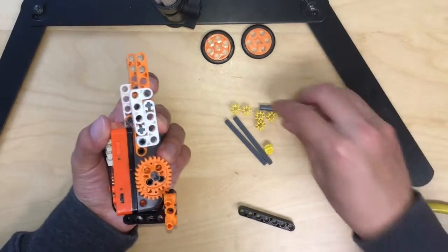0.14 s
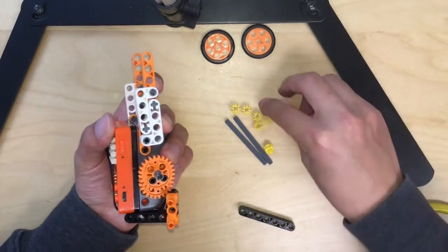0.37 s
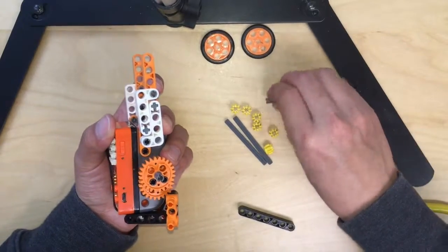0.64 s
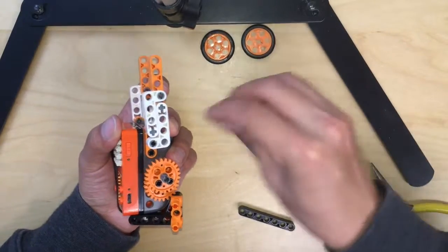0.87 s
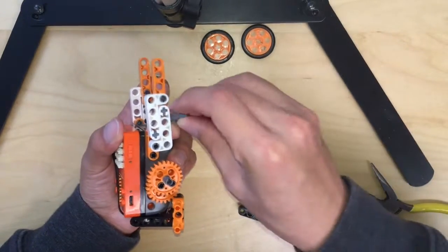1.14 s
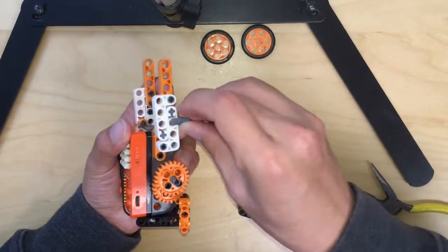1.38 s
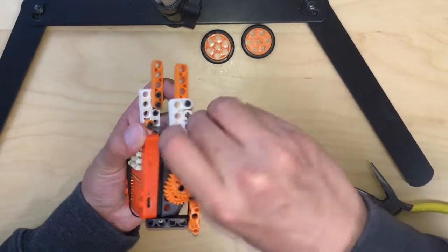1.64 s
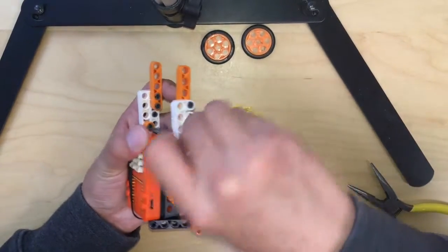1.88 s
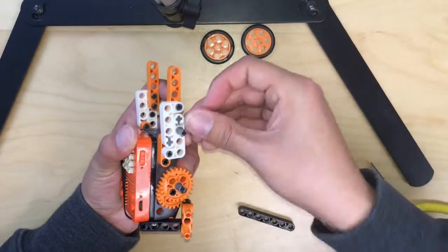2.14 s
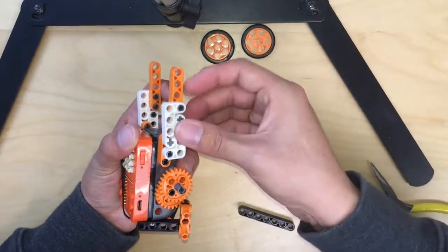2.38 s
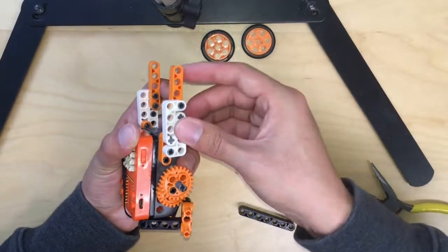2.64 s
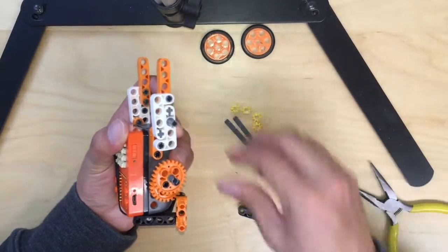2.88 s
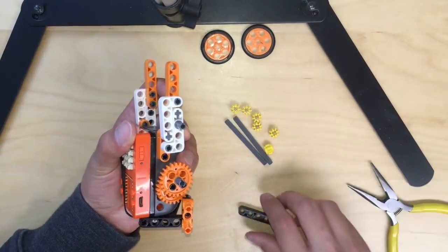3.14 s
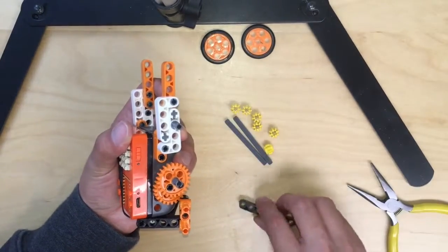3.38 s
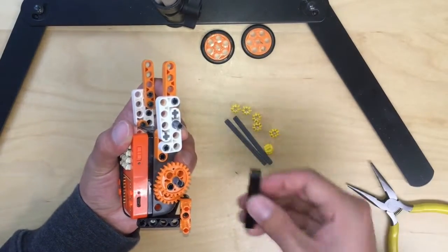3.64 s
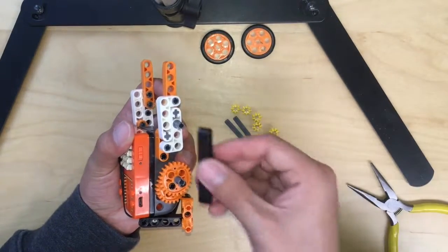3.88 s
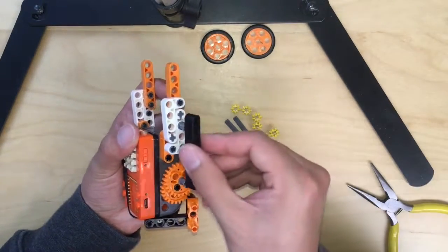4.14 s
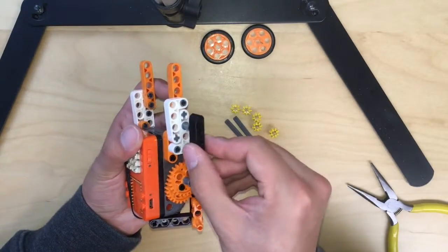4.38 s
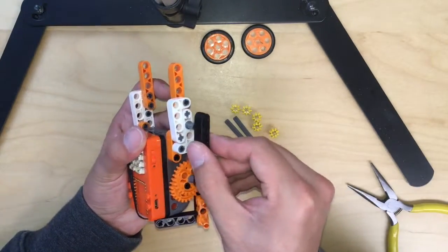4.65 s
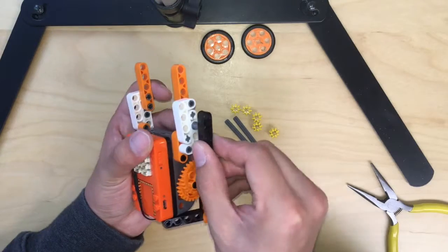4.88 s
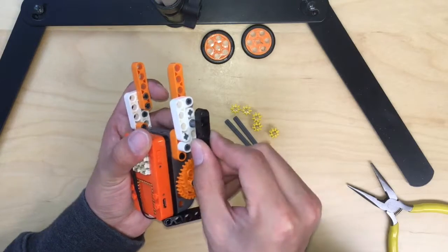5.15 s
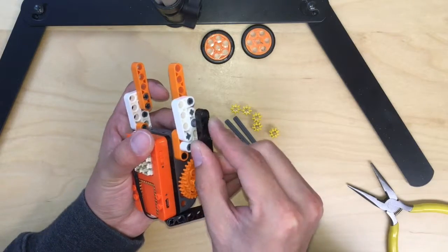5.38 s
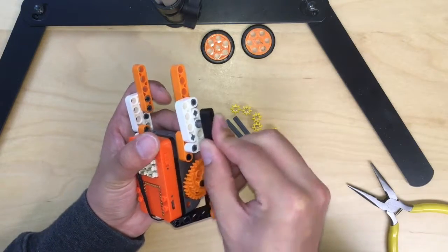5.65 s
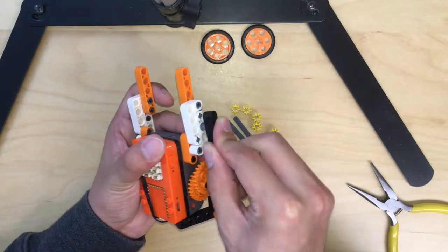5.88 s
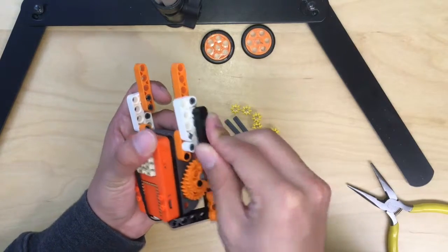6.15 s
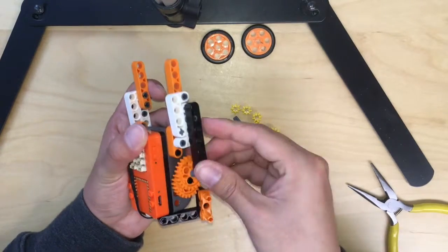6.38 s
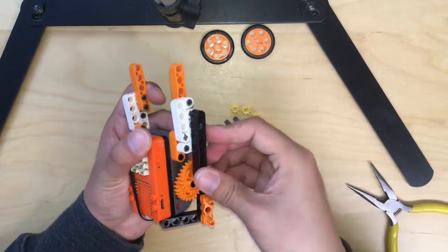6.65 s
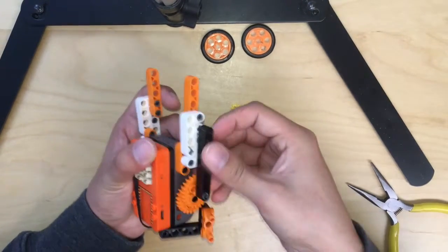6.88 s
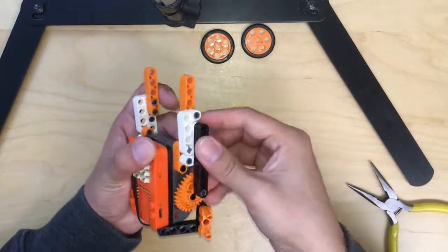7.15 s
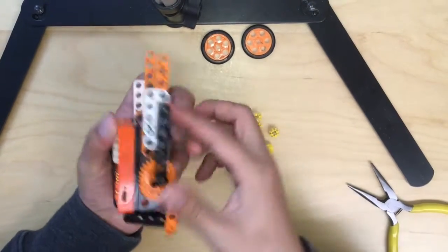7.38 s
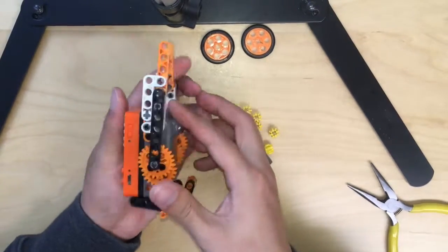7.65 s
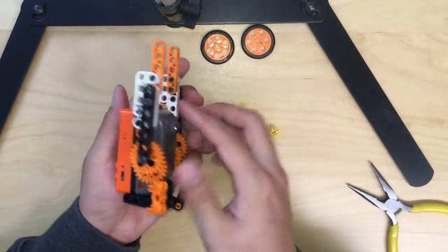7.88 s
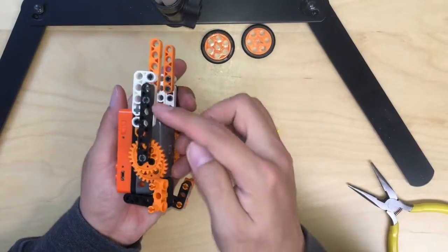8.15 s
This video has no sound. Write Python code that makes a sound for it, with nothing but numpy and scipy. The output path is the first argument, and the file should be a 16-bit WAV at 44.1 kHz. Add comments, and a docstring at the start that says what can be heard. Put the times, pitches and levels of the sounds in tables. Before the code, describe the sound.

In a small quiet room, a close microphone picks up parts dragging on wood in short gritty slips, skin brushing plastic, and pins seating with crisp hollow clicks. One loud snap comes early, after a quiet pause a run of medium clicks, then two sharper snaps, ending with soft swishes and small ticks. A faint unsteady low hum continues throughout, with light hiss that rises after loud snaps.

```python
"""Small plastic beams and pins snap and tick in someone's hands just above a wooden table, close by.
Each snap is a short burst of noise ringing through hollow plastic, with a near wall and the room answering.
Parts drag over wood in uneven slips, skin swishes on plastic, and a loose pin lands and rings.
Underneath, the room hums and rumbles (wavering tones, low noise) and the microphone hisses (high noise);
a noise suppressor holds that noise down and lets it through for a while after each loud snap."""
import sys
import numpy as np
from scipy import signal
from scipy.fft import rfft, irfft, next_fast_len
from scipy.io import wavfile
from scipy.ndimage import uniform_filter1d, map_coordinates

SR = 44100
rng = np.random.default_rng(int(sys.argv[2]) if len(sys.argv) > 2 else 0)


def int16_out(signal):
    """Quantize to a 16-bit WAV file."""
    q = np.round(np.clip(np.atleast_2d(signal).T, -1, 1) * 32767)
    wavfile.write(sys.argv[1], SR, q.astype(np.int16))


def voltage_ratio(level):
    """Linear amplitude factor for a level in decibels (scalar or array-like)."""
    return 10 ** (np.asarray(level, float) / 20)


N = 364266  # length [samples]

# shape of the room's low air noise: (frequency [Hz], relative density [dB per Hz])
RUMBLE_SPECTRUM = [(20, -33), (33, -6.5), (48, -4), (65, -7), (80, -3), (100, -5.5), (135, -4),
                   (161, -17.5), (188, -17), (247, -19.5), (350, -26.5), (600, -34.5), (900, -46.5),
                   (1500, -77.5)]
# shape of the microphone's noise: (frequency [Hz], relative density [dB per Hz])
HISS_SPECTRUM = [(350, -32), (700, -7), (1100, -7), (2000, -10.5), (4200, -12.5), (4950, -17.5),
                 (5700, -12.5), (6800, -13), (7600, -16), (9300, -11.5), (10350, -16), (11200, -11),
                 (14800, -8.5), (15800, -10)]
# hums and faint tones of the room: (frequency [Hz], level before a shared lift [dB], unsteadiness [0-1])
HUM_TONES = [(51.6, -61.5, 1), (119.8, -63, 0.4), (359, -94, 0.1), (1570, -102, 0.1), (1690, -99, 0),
             (1800, -94, 0.1)]
# what the suppressor takes from the noise, given back when it lets go: (frequency [Hz], amount [dB])
SUPPRESSED = [(300, 1), (700, 6), (1500, 8.5), (5000, 12.5), (10000, 10), (15000, 6)]
# how long the room rings: (frequency [Hz], time to fall 60 dB [s])
ROOM_DECAY = [(1000, .09), (3000, 0.12), (6000, .13), (10000, .16), (16000, 0.084)]
# a part dragged over wood, a low set then a high set: (frequency [Hz], width [Hz], relative level [dB])
DRAG_RESONANCES = [
    [(607, 700, -3), (1115, 250, 2.5), (1420, 350, 0.5), (2210, 410, 1), (2660, 330, -3)],
    [(3020, 150, -2.5), (3570, 110, -1.5), (3800, 170, -4), (4510, 140, -3), (5230, 150, -4.5),
     (6320, 310, -7), (8730, 870, -13)],
]
# parts dragged over wood: (start [s], length [s], scuff level [dB], fade over the stroke [dB],
# grit relative to scuff [dB])
DRAG_STROKES = [(.004, 0.015, -72, 2, -20), (.03, 0.26, -80, 5, -22), (0.34, .03, -70, 8.5, 1.5),
                (0.439, .018, -68, 11, -2.5), (.462, 0.04, -69.5, 0, 2), (0.517, 0.076, -70, 3.5, 5),
                (.715, .04, -80.5, 4, -1.5), (1.16, .012, -81, 4, 1), (1.841, 0.022, -77, -3, -5),
                (3.345, 0.019, -68.5, -2.5, -15), (3.371, 0.034, -66.5, 15, -2.5),
                (6.023, .008, -74.5, -0.5, -2), (6.045, .015, -68, 9, -9), (7.418, 0.12, -68.5, 8, -2.5),
                (7.588, 0.041, -79, 1, -0.5), (7.686, .08, -87.5, 2.5, 7)]
# shape of the sound of skin on plastic: (frequency [Hz], relative density [dB per Hz])
SKIN_SPECTRUM = [(3820, -55), (6500, -10), (11200, -8.5), (12100, -11.5), (14000, 1.5), (16000, -8)]
# skin brushing plastic: (start [s], length [s], level [dB])
SKIN_STROKES = [(0.34, .04, -88), (.72, 0.037, -72.5), (1.827, .04, -77), (2.053, .12, -75.5),
                (3.349, 0.041, -79), (6.018, .012, -72), (7.364, .025, -71), (7.466, 0.066, -70),
                (7.675, .1, -74.5)]
# a loose pin lands on the table: (time [s], level [dB])
PIN_LANDINGS = [(0.332, -67.5), (0.472, -55)]
# the notes of the pin: (frequency [Hz], level relative to the landing [dB], time to fall 60 dB [s])
PIN_NOTES = [(10080, 9.2, 0.056), (12540, 4, .035)]
# parts touching: (time [s], energy over 1 ms in each range before the other terms [dB],
# brightness [dB per octave], hollowness [dB per octave squared], contact length [ms])
CONTACTS = [(0.3196, -66, -6, -5.5, 3.1), (0.333, -69, 9.5, 2, 3.9), (0.398, -76, 4.3, 4, 3.9),
            (0.4072, -71, -0.2, 0.6, 4.4), (0.4321, -69, -5, -7, 2.8), (0.4364, -60.5, -9.5, -8.5, 4.5),
            (0.4623, -58, 3, 2, 5.1), (0.4725, -56, 8, 2, 3.7), (1.116, -51.5, -2, -3.5, 2.6),
            (1.1622, -60.5, -6.5, -5.5, 5.5), (1.3285, -72.5, -3.5, -1.5, 2.1),
            (1.4953, -63, -6.5, -4, 5.0), (1.5223, -60, 0.0, -3.5, 2.2), (1.7419, -58.5, 4.1, 2, 1.8),
            (1.779, -65.5, -6, -3.4, 2.1), (1.8593, -67.5, -5, 1, 4.7), (2.5387, -73, 10, -0.5, 2.0),
            (2.5507, -70, 8, -3, 2.3), (2.562, -29, 9, -0.7, 2.6), (2.8278, -61.5, 0.2, -4, 4.0),
            (2.8388, -66, -1, -0.5, 3.0), (3.3657, -50, -1.2, -1, 2.8), (4.2392, -63, 3.8, 0, 1.7),
            (4.245, -66, -1, 0, 2), (4.655, -70.5, 0, -0.5, 1.5), (4.6961, -55, 0.9, 1.5, 1.2),
            (4.7283, -71, 1, 3, 1.3), (5.004, -73.5, -4, 0, 2.5), (5.1075, -75, 4.3, 0.9, 4.1),
            (5.3142, -46, 4, 1.2, 2.8), (5.3263, -69, -4.5, 0.5, 3.6), (5.4783, -72, 1.5, 0.5, 1.9),
            (5.5831, -67, -0.5, -2.5, 1.3), (5.673, -54.5, 5.5, 4.5, 1.7), (5.6763, -40.5, 2, -1, 3.3),
            (5.71, -51, 5.8, -0.6, 1.9), (5.7181, -60.5, 4.5, 4, 2), (5.7627, -60.5, -0.8, -2.5, 2.4),
            (5.8011, -73.5, 1.9, 1.5, 1.1), (5.886, -62.5, -1.2, -1.1, 1.8),
            (6.0306, -47.5, -2.5, -1.6, 3.2), (6.0422, -59, -3.7, 0.1, 3.3), (6.2905, -65.5, 0.5, -3, 1.5),
            (6.601, -68.5, 0, -0.5, 2), (6.6255, -73, -4, 2, 6.1), (6.6333, -39.5, -2.1, 1, 2.2),
            (6.648, -23.5, 3, 0, 1.5), (6.9552, -59, -1, -2, 1.0), (7.1225, -58.5, 0, -1.8, 3.2),
            (7.134, -64.5, -2, 1, 4.9), (7.1485, -22.5, 6.5, 0.55, 1.66), (7.382, -62, -0.5, 0, 4.0),
            (7.429, -64.5, -3.6, 1.5, 3.7), (7.441, -62, 0.5, 1, 3.5), (7.565, -52, -2.5, -3.5, 1.5),
            (7.6421, -60, -6, -1, 1.5)]
# average broad resonances of the hollow plastic: (frequency [Hz], width [Hz], relative level [dB])
PLASTIC_RESONANCES = [(1185, 150, -19), (2470, 520, -11.5), (3420, 410, -14.5), (4150, 270, -14.5),
                      (5550, 470, -9), (6700, 800, -6.5), (8060, 1200, -3), (9270, 1600, -0.5),
                      (11300, 1400, 2), (13100, 1800, 2), (15200, 1500, 1.5)]
# edges of the knock, middle, click and sparkle ranges: (frequency [Hz])
RANGE_EDGES = [900, 3200, 7000, 11500, 16500]
# added to every contact in those four ranges: (level [dB])
RANGE_LIFT = [0.27, -1, 1.1, -0.5]

PIVOT_HZ = 6000  # brightness and hollowness change nothing here
TOP_HZ = 15950  # little or nothing is heard above this


def unit(x):
    """Scale a sound to an average (rms) size of 1."""
    return x / np.sqrt(np.mean(x ** 2) + 1e-20)


def along(points, hz):
    """Read a curve of (Hz, value) points on a log frequency axis."""
    f, value = np.transpose(points)
    return np.interp(np.log(hz + 1), np.log(f + 1), value)


def wobble(rate):
    """A smooth random curve with rate new values a second."""
    knots = rng.standard_normal(int(N * rate / SR) + 4)
    return map_coordinates(knots, [np.arange(N) * rate / SR])


def coloured(x, spectrum):
    """Shape a sound by a spectrum of (Hz, dB) points, then scale it to rms 1."""
    padded = next_fast_len(N + 8192)
    gain = voltage_ratio(along(spectrum, np.fft.rfftfreq(padded, 1 / SR)))
    return unit(irfft(rfft(x, padded) * gain, padded)[:N])


def below(x, hz):
    """Remove everything from hz upward."""
    return irfft(rfft(x) * (np.fft.rfftfreq(N, 1 / SR) < hz), N)


def resonances(modes, f):
    """Frequency response of damped (Hz, width, dB) resonances, with alternating signs."""
    return sum((-1) ** k * voltage_ratio(db) * 1j * f * width / (centre * centre - f * f + 1j * f * width)
               for k, (centre, width, db) in enumerate(modes))


def strokes(start, length, db, fade_db, rise, fall):
    """One loudness curve per stroke: a rise, a hold that fades, a fall (rise and fall in dB per s)."""
    t = np.arange(N) / SR - np.c_[start]
    edges_db = rise * np.maximum(-t, 0) + fall * np.maximum(t - np.c_[length], 0)
    progress = np.clip(t / np.c_[length], 0, 1)
    return voltage_ratio(np.c_[db] - np.c_[fade_db] * progress - edges_db)


def room_tail(size):
    """A fresh noise tail of energy 1, in which each frequency dies away at its own speed."""
    hz, t, z = signal.stft(rng.standard_normal(size), SR, nperseg=128)
    decay = voltage_ratio(-60 * t / along(ROOM_DECAY, hz)[:, None])
    tail = signal.istft(z * decay, SR, nperseg=128)[1][:size]
    return tail / np.linalg.norm(tail)


def background():
    """Low air rumble of the room and the microphone's own hiss, both noise with a slowly wavering level."""
    drift_db = 1.36
    rumble_db = -57.5 + drift_db * wobble(1.5)
    hiss_db = -76 + drift_db * wobble(1.5) + .9 * wobble(10)  # the hiss also flickers faster
    rumble = voltage_ratio(rumble_db) * coloured(rng.standard_normal(N), RUMBLE_SPECTRUM)
    hiss = voltage_ratio(hiss_db) * coloured(rng.standard_normal(N), HISS_SPECTRUM)
    return rumble + hiss


def hum():
    """Room tones as sine waves; the unsteady ones drift in size and phase."""
    t = np.arange(N) / SR
    lift_db = 1.0
    out = np.zeros(N)
    for hz, db, loose in HUM_TONES:
        size = voltage_ratio(db + lift_db) * (1 + loose * wobble(6.2))
        out += size * np.sin(2 * np.pi * hz * t + 4.5 * loose * wobble(5.4))
    return out


def slides():
    """Parts drag over wood in quick uneven slips; skin on plastic gives a smoother high swish."""
    *drag, grit_db = np.transpose(DRAG_STROKES)
    drags = strokes(*drag, rise=1160, fall=800)
    scuff, grit = drags.sum(0), voltage_ratio(grit_db) @ drags
    brush = strokes(*np.transpose(SKIN_STROKES), 0, rise=400, fall=540).sum(0)

    # around 130 slips a second; each starts strong and eases off
    slip_rate = 130 * voltage_ratio(2.5 * wobble(40))
    cycle = np.cumsum(slip_rate) / SR % 1
    slips = (.3 + np.exp(-cycle / .15)) * voltage_ratio(1.5 * wobble(90)) * rng.standard_normal(N)

    f = np.fft.rfftfreq(N, 1 / SR)
    low, high = (unit(irfft(rfft(slips) * resonances(modes, f), N)) for modes in DRAG_RESONANCES)
    swish = coloured(rng.standard_normal(N), SKIN_SPECTRUM) * voltage_ratio(1.8 * wobble(60))
    return scuff * low + grit * high + brush * swish


def pin():
    """A small hard pin rings on landing: two high notes that die away."""
    out, t = np.zeros(N), np.arange(SR // 8) / SR
    ring = sum(voltage_ratio(db - 60 * t / t60) * np.sin(2 * np.pi * hz * t) for hz, db, t60 in PIN_NOTES)
    for time, db in PIN_LANDINGS:
        out[round(time * SR):][:len(t)] += voltage_ratio(db) * ring
    return out


def clicks(size=16384):
    """Each contact is a short rattle ringing through the plastic; a near wall and the room answer."""
    out, t, f = np.zeros(N + size), np.arange(size) / SR, np.fft.rfftfreq(size, 1 / SR)
    which = np.digitize(f, RANGE_EDGES)
    centres = np.convolve(RANGE_EDGES, [.5, .5], "valid")
    octave = np.log2(centres / PIVOT_HZ)

    def share(z, range_db):
        """Move the energy in each range towards its wanted level (over 1 ms)."""
        energy = np.bincount(which, np.abs(z) ** 2)[1:5] * 2000 / size / SR
        return z * voltage_ratio(np.interp(f, centres, range_db - 10 * np.log10(energy)))

    for time, db, bright, hollow, ms in CONTACTS:
        # where the parts touch sets the energy in each range
        range_db = db + bright * octave + hollow * octave ** 2 + RANGE_LIFT
        # a sharp crack, then the parts chatter as they seat
        age = 1000 * t / ms
        fading = np.exp(-3 * age) + 0.67 * np.exp(-.8 * age)
        rattle = rfft(rng.standard_normal(size) * fading * (1 - np.exp(-t / 1e-4)))
        # even out the rattle's spectrum, so the plastic resonances and range levels set the colour
        rattle = rattle / np.sqrt(uniform_filter1d(np.abs(rattle) ** 2, size=200))

        # no two contacts ring quite alike
        scatter = 1 + rng.standard_normal((len(PLASTIC_RESONANCES), 3)) * [.04, .15, .15]
        body = resonances(PLASTIC_RESONANCES * scatter, f)
        body *= (1j * f / (1j * f + 700)) ** 3  # small parts radiate little bass
        body *= np.where(f < TOP_HZ, 1, voltage_ratio(-14.5))

        # sharing twice brings the ranges closer to their levels
        blow = irfft(share(share(rattle * body, range_db), range_db), size) * (t < .1)
        wall = voltage_ratio(-23.5) * np.roll(blow, round(0.013 * SR))  # 13 ms later
        into_room = share(share(body, range_db), range_db) * (f < TOP_HZ)
        room = irfft(into_room * rfft(room_tail(size)), size)
        room = voltage_ratio(-16) * np.roll(room, round(0.0016 * SR))  # 1.6 ms later
        out[round(time * SR):][:size] += blow + wall + room
    return out[:N]


def scene():
    """Hands at work over the hum, as one channel."""
    return (clicks() + pin() + below(slides(), TOP_HZ) + hum())[None]


def released(x, hold=.408, first=.7, opens_s=.25):
    """0 while the suppressor works; after a loud peak it lets go most of the way, then fully (hold in s)."""
    n = np.arange(N)
    last_peak = np.maximum.accumulate(np.where(np.abs(x) > voltage_ratio(-23), n, -N))
    since = (n - last_peak) / SR
    return (since < hold) * (first + (1 - first) * np.clip(since / opens_s, 0, 1))


def roll_off(x):
    """The treble ends steeply here."""
    return signal.sosfilt(signal.butter(12, 17090, fs=SR, output="sos"), x)


def record(dry):
    """Add the noise, which comes up where the suppressor lets go; the dry sound reaches a little higher."""
    hz, t, z = signal.stft(background(), SR, nperseg=256)
    gate = np.interp(t, np.arange(N) / SR, released(dry[0]))
    given_back = voltage_ratio(along(SUPPRESSED, hz)[:, None] * gate)
    noise = signal.istft(z * given_back, SR, nperseg=256)[1][:N]
    mix = below(dry, 16700) + below(noise, TOP_HZ)
    return roll_off(mix)


dry = scene()
out = record(dry)
int16_out(out)
```